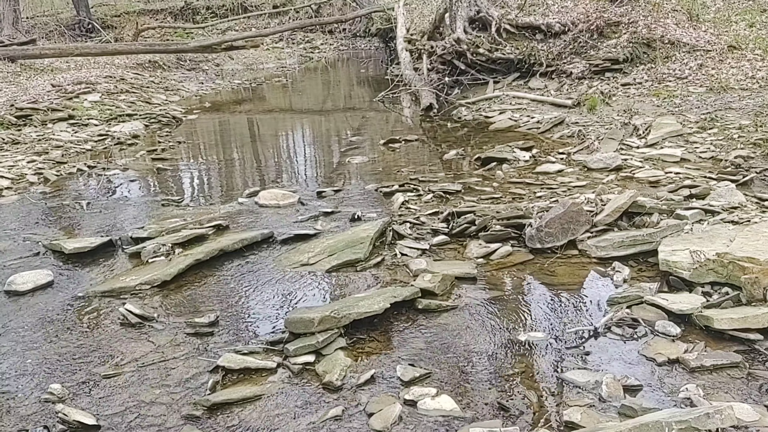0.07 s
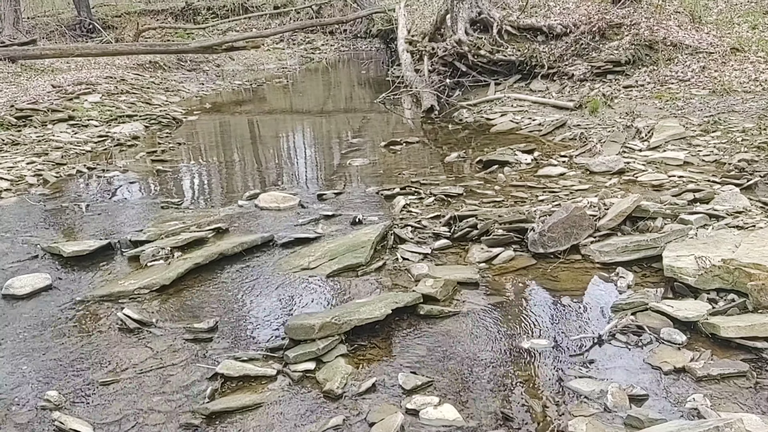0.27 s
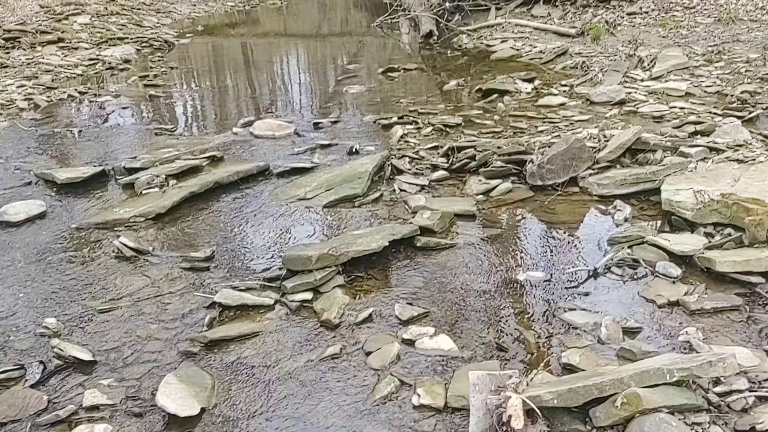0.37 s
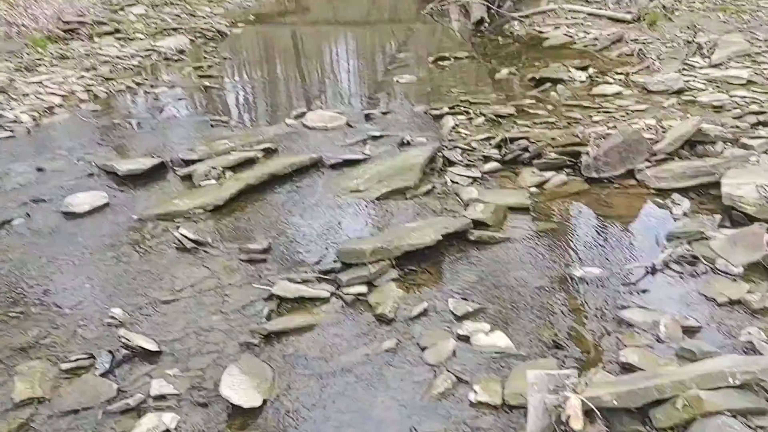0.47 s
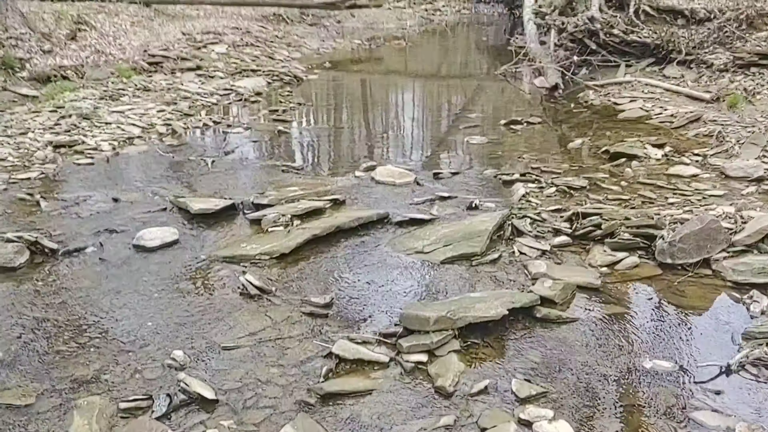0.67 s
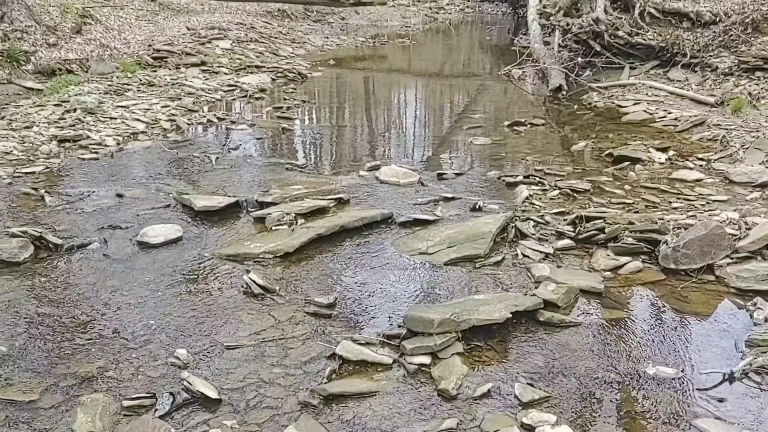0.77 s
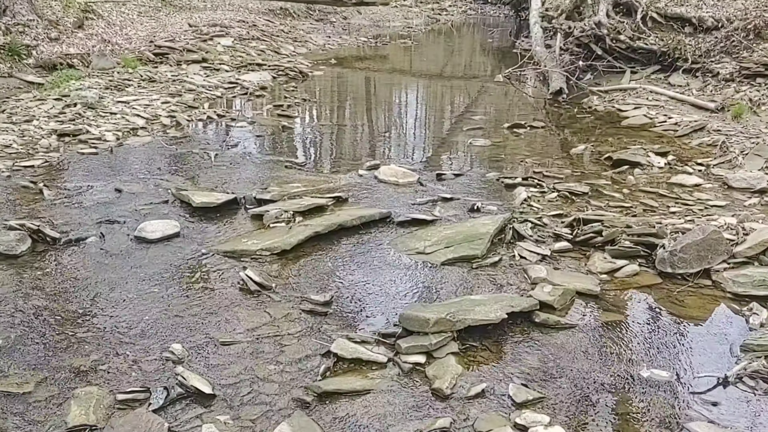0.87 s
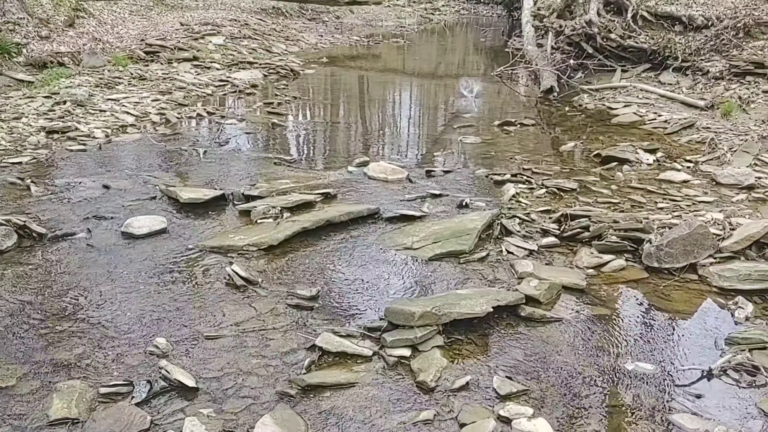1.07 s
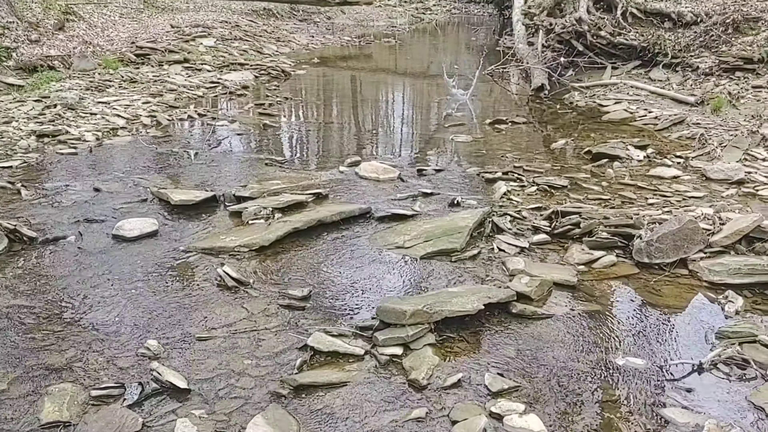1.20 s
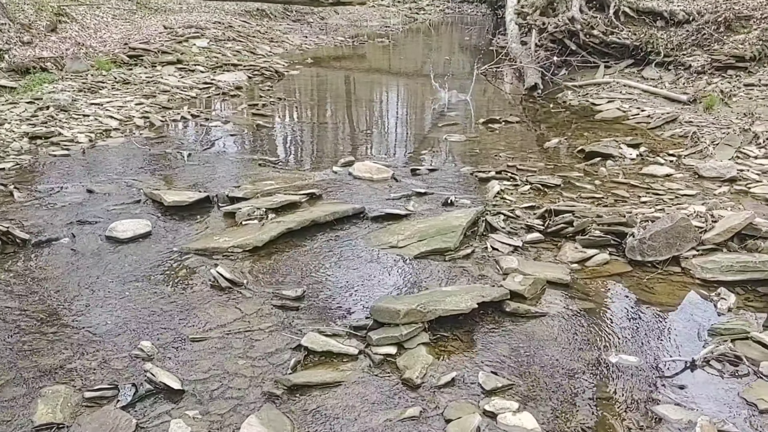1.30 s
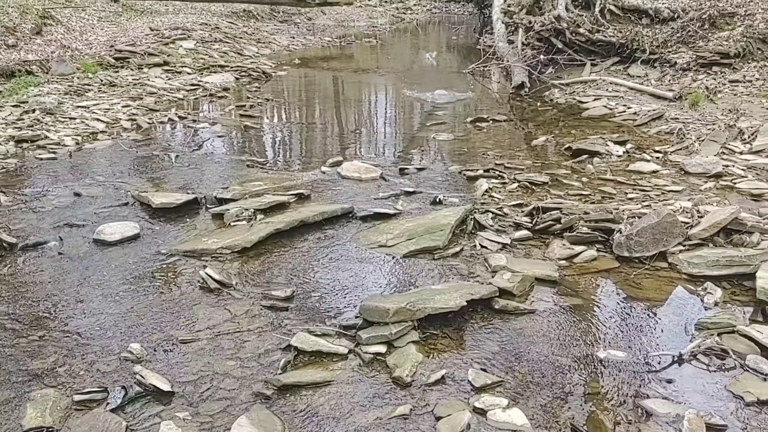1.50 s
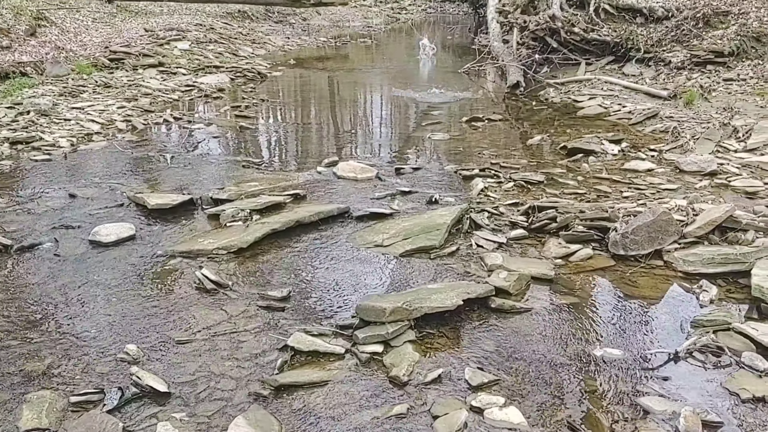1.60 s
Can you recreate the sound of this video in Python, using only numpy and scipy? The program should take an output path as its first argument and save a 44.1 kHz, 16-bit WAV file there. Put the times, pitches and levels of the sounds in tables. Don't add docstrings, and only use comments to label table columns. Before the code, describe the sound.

A brief cluster of dry, hard stone knocks and pebble ticks amid cloth rustle, then mostly soft shallow water, faint gurgles and a bird's repeated whistled phrase among trees, recorded outdoors with a handled stereo microphone.

```python
import sys
import numpy as np
from scipy import signal
from scipy.fft import rfft, irfft
from scipy.io import wavfile
from scipy.ndimage import uniform_filter1d

SR = 44100
rng = np.random.default_rng(int(sys.argv[2]) if len(sys.argv) > 2 else 0)


def wrap_up_sound(samples):
    columns = np.atleast_2d(samples).T
    tamed = np.clip(columns, -1, 1)
    steps = np.round(tamed * 32767).astype(np.int16)
    wavfile.write(sys.argv[1], SR, steps)


def makeup_ratio(level_db):
    decades = np.asarray(level_db, float) / 20
    return 10 ** decades


N = 72765
T_S = np.arange(N) / SR


def rms_one(x):
    return x / np.sqrt(np.mean(x ** 2) + 1e-20)


def at_hz(points, hz):
    table_hz, value = np.array(points).T[:2]
    return np.interp(np.log(hz), np.log(table_hz), value)


def sides(pan_db):
    return makeup_ratio(np.array([[.5], [-.5]]) * pan_db)


def bandpass(low_hz, high_hz):
    return signal.butter(2, [low_hz, high_hz], "band", fs=SR, output="sos")


def drift(rate_hz):
    hop, settle = 40, 2000
    pole = np.exp(-2 * np.pi * rate_hz * hop / SR)
    white = rng.standard_normal(N // hop + settle + 2)
    slow = signal.lfilter([1], [1, -2 * pole, pole * pole], white)[settle:]
    return np.interp(np.arange(N) / hop, np.arange(len(slow)), rms_one(slow))


def grains(per_s, spread_db):
    shape = (2, 2, N)
    size = makeup_ratio(spread_db * np.minimum(rng.exponential(1, shape), 4))
    sign = rng.choice([-1, 1], shape)
    struck = rng.random(shape) < per_s / SR
    return size * sign * struck + 1e-9


def banded(spectrum, white, patchy_db, alike_share):
    # frequency in Hz, left-right correlation.
    likeness = [(60, 1), (240, 1), (950, 0.11), (3770, 0.017), (15000, -0.079)]
    # frequency in Hz, left minus right in dB.
    lean = [(60, 3.5), (240, 2), (950, -2), (3770, 4.5), (15000, -6)]
    out, together = 0, drift(6)
    edges_hz = 31 * 2 ** np.arange(0, 9.1, .5)
    for k, (low_hz, high_hz) in enumerate(zip(edges_hz, edges_hz[1:])):
        mid, side = signal.sosfilt(bandpass(low_hz, high_hz), white[k % 2])
        hz = np.sqrt(low_hz * high_hz)
        alike = np.clip(alike_share * at_hz(likeness, hz), -.9, .97)
        flicker_db = patchy_db * (1.2 * together + drift(8.7))
        stereo = np.sqrt(1 + alike) * mid + np.sqrt(1 - alike) * side * [[1], [-1]]
        out = out + makeup_ratio(flicker_db) * sides(at_hz(lean, hz)) * stereo
    bins_hz = np.arange(1, N // 2 + 2) * SR / N
    return rms_one(irfft(rfft(out) * makeup_ratio(at_hz(spectrum, bins_hz)), N))


def ping(start_s, hz, t60_s, rise_s=0):
    t = np.maximum(T_S - start_s, 0)
    rise = 1 - np.exp(-t / (rise_s + 1 / (2.4 * hz)))
    return np.sin(2 * np.pi * hz * t) * makeup_ratio(-60 * t / t60_s) * rise


def knocks():
    # start in seconds, left lag in seconds, rise in seconds.
    hits = [
        (0.4013, 0.000603, .0012),
        (0.5611, 0.00123, 0.000084),
        (0.621, 0.00047, 0.000094),
    ]
    # frequency in Hz, t60 in seconds, left dB, right dB.
    stones = [
        [(330, 0.015, -21, -26), (1900, 0.005, -11.5, -13), (2870, 0.006, -25, -9.5), (3650, 0.0035, -22, -5),
         (6030, 0.0041, -20, -15.5), (9000, 0.0013, -36, -11.5)],
        [(590, 0.011, -13, -11), (1200, 0.0094, -7, -10), (2200, 0.0047, -37, -18.5),
         (3750, 0.0038, -57, -13.5), (5000, 0.0028, -25, -17.5), (7200, 0.0017, -44, -18),
         (10500, 0.001, -57, -15)],
        [(330, 0.021, -18, -47), (900, 0.005, -10, -48), (1650, 0.0052, -7.5, -49), (4200, 0.0028, -20, -34),
         (6340, 0.0016, -29, -26.5), (10100, 0.0017, -34, -28.5)],
    ]
    port_hz, port_lag_s = 3835, 0.000843
    lows_lag_s = 0.00038
    out = np.zeros((2, N))
    for (start_s, left_lag_s, rise_s), stone in zip(hits, stones):
        for k, (hz, t60_s, left_db, right_db) in enumerate(stone):
            port_s = port_lag_s * np.exp(-np.log2(hz / port_hz) ** 2)
            late_s = start_s + port_s + lows_lag_s * (hz < port_hz)
            left = makeup_ratio(left_db - 0.5) * ping(late_s + left_lag_s, hz, t60_s, rise_s)
            right = makeup_ratio(right_db + 3.5) * ping(late_s, hz, t60_s, rise_s)
            out -= (-1) ** k * np.array([left, right])
    return out


def ticks():
    # start in seconds, peak in dB, frequency in Hz, ring in cycles, left minus right in dB.
    taps = [(.255, -45, 600, 3.6, 2), (0.336, -49, 1900, 3.8, 21), (.4700, -42.5, 2200, 6, 12),
            (0.4727, -36, 1510, 1.64, 24), (0.4765, -25, 950, 1.04, -2), (0.5151, -44, 1200, 2.6, 21),
            (0.52, -26, 320, 1, 19), (0.5523, -66, 900, 3, 12), (0.5567, -32, 1530, 1, 10),
            (0.5811, -29.5, 1390, 1.14, 18), (.6157, -28, 1200, 1, 21), (0.714, -50, 1243, 15, 4),
            (0.919, -49, 1720, 5.3, 10), (1.197, -54.5, 6000, 3.8, -13), (1.559, -48, 765, 2.2, 5),
            (1.5632, -51, 3300, 9, -13), (1.5642, -45.5, 3550, 5.9, -16), (1.5722, -46.5, 3330, 7.8, -13.5),
            (1.563, -58, 9900, 5.6, -16), (1.629, -57, 9000, 2.6, -23)]
    return sum(makeup_ratio(db + 8) * sides(pan_db) * ping(start_s, hz, 2.74 * cycles / hz)
               for start_s, db, hz, cycles, pan_db in taps)


def crunch():
    # centre in seconds, length in seconds, level in dB, left minus right in dB.
    grinds = [(.512, 0.044, -51.5, 18.5), (0.558, 0.02, -37, 20), (.577, 0.022, -43, 12),
              (0.609, 0.026, -47.5, 16), (0.626, 0.029, -40, 20), (0.671, 0.055, -49.5, 12)]
    # frequency in Hz, level in dB.
    rub = [(150, 2.5), (400, 4.5), (1500, 2.5), (2300, -2), (3300, -13.5), (7500, -19), (14000, -37)]
    swell = 0
    for centre_s, length_s, db, pan_db in grinds:
        hump = np.cos(np.pi * np.clip((T_S - centre_s) / length_s, -.5, .5))
        swell = swell + makeup_ratio(db) * sides(pan_db) * hump
    return swell * banded(rub, grains(per_s=4400, spread_db=2.2), patchy_db=1.5, alike_share=.6)


def spits():
    # start in seconds, level in dB, t60 in seconds, frequency in Hz, left minus right in dB.
    bursts = [(0.41, -54.5, .05, 13300, -16), (0.471, -55, 0.044, 13800, -13),
              (1.0838, -54, 0.062, 10900, -14.5), (1.0851, -54, .035, 3250, -16),
              (1.558, -67, 0.11, 11900, -20)]
    out = 0
    for start_s, db, t60_s, hz, pan_db in bursts:
        band = bandpass(hz * 0.88, min(hz * 1.43, .45 * SR))
        noise = rms_one(signal.sosfilt(band, grains(6000, 2.6)[0]))
        decay = (T_S > start_s) * makeup_ratio(-60 * np.maximum(T_S - start_s, 0) / t60_s)
        out = out + makeup_ratio(db) * sides(pan_db) * noise * decay
    return out


def thumps():
    # start in seconds, level in dB, frequency in Hz, left minus right in dB.
    pushes = [(0.343, -39.5, 105, 7.5), (0.484, -38.5, 107, -0.5), (0.566, -44, 86, 23.5),
              (.619, -39.5, 151, 24)]
    return sum(makeup_ratio(db + 8.5) * sides(pan_db) * ping(start_s, hz, 5.2 / hz)
               for start_s, db, hz, pan_db in pushes)


def rustle(effort_db):
    # frequency in Hz, level in dB per Hz.
    cloth = [(40, -21), (85, -6), (180, -16), (500, -11.5), (1000, -19), (2000, -20), (5000, -31),
             (7500, -43), (15000, -47)]
    return makeup_ratio(effort_db) * banded(cloth, grains(3000, 1.36), patchy_db=0.0, alike_share=0.69)


def bird():
    # start in seconds, length in seconds, from Hz, to Hz, level in dB.
    notes = [(0.413, 0.03, 3650, 3020, -58.5), (0.468, .026, 3563, 4310, -56.5),
             (0.535, 0.067, 2707, 2860, -54.5), (0.641, .042, 2150, 2870, -51.5),
             (.813, 0.043, 3695, 2956, -53.5), (.865, 0.03, 3620, 4135, -56),
             (0.932, 0.077, 2678, 2791, -52.5), (1.052, 0.056, 2290, 2680, -64),
             (1.209, 0.0416, 3650, 3025, -58.5), (1.263, 0.0268, 3600, 4125, -58),
             (1.33, .07, 2670, 2766, -58), (1.599, .042, 3685, 3050, -60)]
    edge_s, swell_db = .012, 5
    near_pan_db, shadow_db_per_khz, left_lag_s = -12.5, -11, .0002
    woods_t60_s, woods_db = 0.85, -6
    song = np.zeros((2, N))
    for start_s, length_s, from_hz, to_hz, db in notes:
        u = np.clip((T_S - start_s) / length_s, 0, 1)
        glide_hz = from_hz + (to_hz - from_hz) * (.5 * u + .5 * np.sin(np.pi * u / 2) ** 2)
        edges = np.clip(np.minimum(u, 1 - u) * length_s / edge_s, 0, 1)
        shape = edges * makeup_ratio(-swell_db * np.abs(u - .7) / 1.3)
        pan_db = near_pan_db + shadow_db_per_khz * ((from_hz + to_hz) / 2000 - 2.7)
        tone = np.sin(2 * np.pi * np.cumsum(glide_hz) / SR)
        song += sides(pan_db) * makeup_ratio(db + 2.5) * shape * tone
    song = song * makeup_ratio(0.76 * drift(87))

    tail_s = T_S[:SR // 2]
    tail = rng.standard_normal((2, SR // 2)) * makeup_ratio(-60 * tail_s / woods_t60_s) * (tail_s > .01)
    tail = tail / np.sqrt(np.sum(tail ** 2, axis=1, keepdims=True))
    wet = signal.fftconvolve(song, tail, axes=1)[:, :N]
    direct = np.array([np.interp(T_S - left_lag_s, T_S, song[0]), song[1]])
    return direct + makeup_ratio(woods_db) * wet


def creek():
    # frequency in Hz, level in dB per Hz.
    water = [(40, -24), (114, -10.5), (166, -19.5), (484, -13.5), (1300, -17), (2700, -19), (5000, -18.5),
             (7200, -35), (15500, -37.5)]
    white = rng.standard_normal((2, 2, N))
    return makeup_ratio(-59.5) * banded(water, white, patchy_db=.6, alike_share=1.3)


def gurgles():
    # start in seconds, level in dB, frequency in Hz, ring in cycles.
    pockets = [(.185, -55.5, 330, 4.6), (0.259, -51.5, 86.5, 4.7), (.275, -60.5, 636, 51),
               (.39, -58.5, 306, 6.5), (0.721, -60, 307.6, 9.3), (.85, -62.5, 727, 14),
               (1.285, -62, 482, 9.8), (1.56, -59.5, 590, 5.4)]
    return sum(makeup_ratio(db + 11.5) * ping(start_s, hz, 5.8 * cycles / hz)
               for start_s, db, hz, cycles in pockets)


def fizz():
    high = signal.butter(2, 9000, "high", fs=SR, output="sos")
    envelope = signal.lfilter([1], [1, -.97], grains(per_s=49, spread_db=1.6)[0] ** 2) ** .5
    pops = envelope * rng.standard_normal((2, N))
    return makeup_ratio(-80) * sides(-12) * rms_one(signal.sosfilt(high, pops))


def drone(effort_db):
    centre_hz, width_hz, level_db, follows = 109.3, 22.4, -61.5, 0.37
    band = bandpass(centre_hz - width_hz / 2, centre_hz + width_hz / 2)
    mid, side = signal.sosfilt(band, rng.standard_normal((2, N + SR)))[:, SR:]
    mid = rms_one(mid / uniform_filter1d(mid ** 2, size=2500) ** 0.48)
    stereo = rms_one(mid + 0.12 * rms_one(side) * [[1], [-1]])
    return makeup_ratio(level_db + follows * (effort_db + 65.5)) * stereo


def scene():
    # time in seconds, rustle level in dB.
    effort = [(.03, -63), (.12, -52.5), (.24, -47.5), (.35, -47.5), (.45, -45.5), (.6, -46), (.7, -51),
              (.78, -54.5), (1.0, -56.5), (1.1, -63.5), (1.45, -60), (1.56, -57.5), (1.65, -62.5)]
    effort_db = np.interp(T_S, *np.transpose(effort))
    hand = knocks() + ticks() + crunch() + spits() + thumps() + rustle(effort_db)
    water = creek() + gurgles() + fizz()
    return hand + bird() + water + drone(effort_db)


def roll_off(x):
    return signal.sosfilt(signal.butter(12, 15850, fs=SR, output="sos"), x)


def record(dry):
    start_s, fade_s, low_cut_hz, top_hz = 0.0265, 0.006, 33, 15750
    gate = np.clip((T_S - start_s) / fade_s, 0, 1)
    low_cut = signal.butter(3, low_cut_hz, "high", fs=SR, output="sos")
    high_cut = signal.cheby2(12, 60, top_hz * 1.095, fs=SR, output="sos")
    mix = signal.sosfilt(np.vstack([low_cut, high_cut]), dry * gate)
    return roll_off(mix)


dry = scene()
out = record(dry)
wrap_up_sound(out)
```